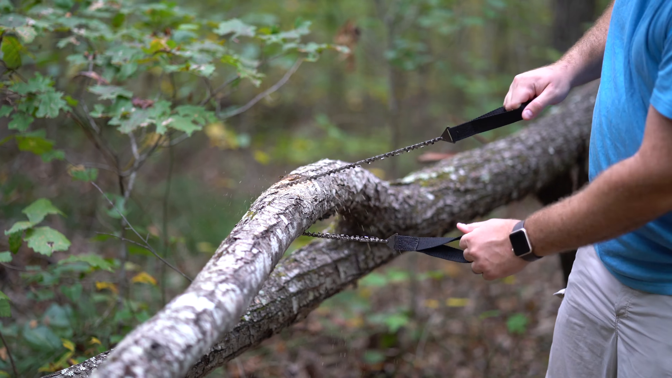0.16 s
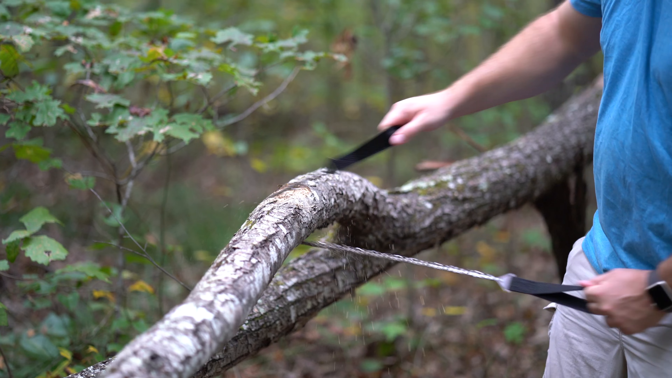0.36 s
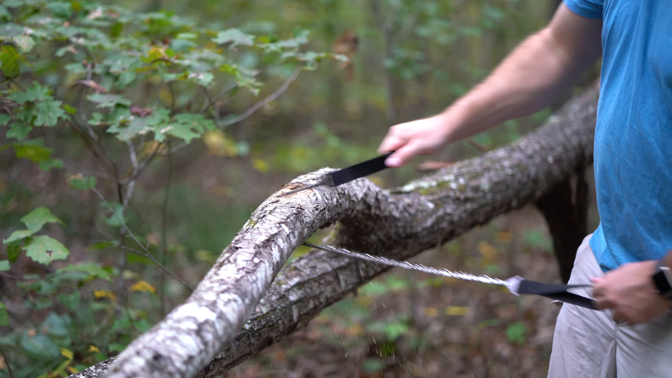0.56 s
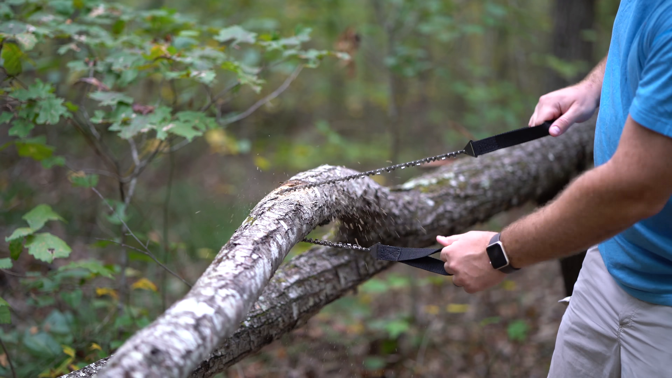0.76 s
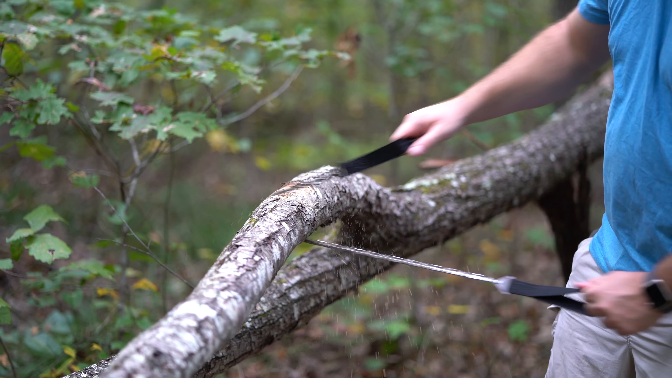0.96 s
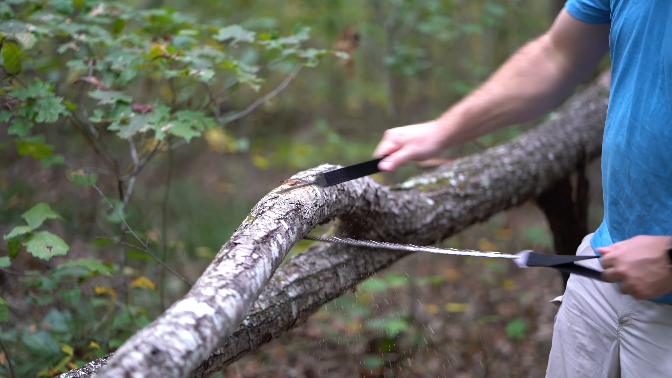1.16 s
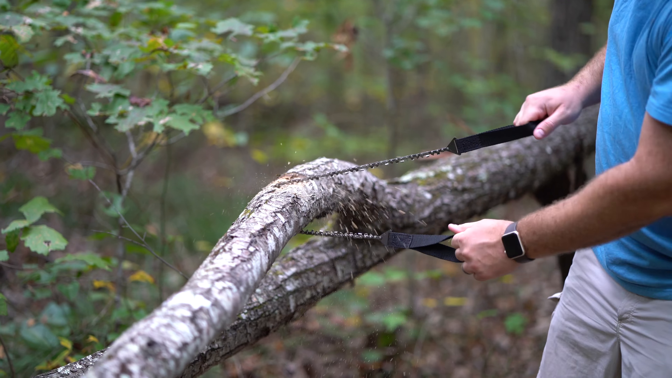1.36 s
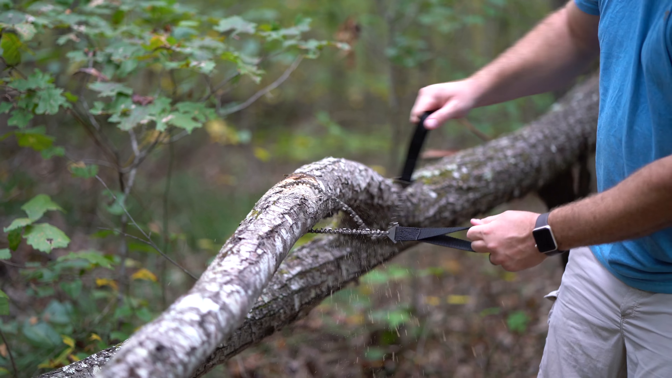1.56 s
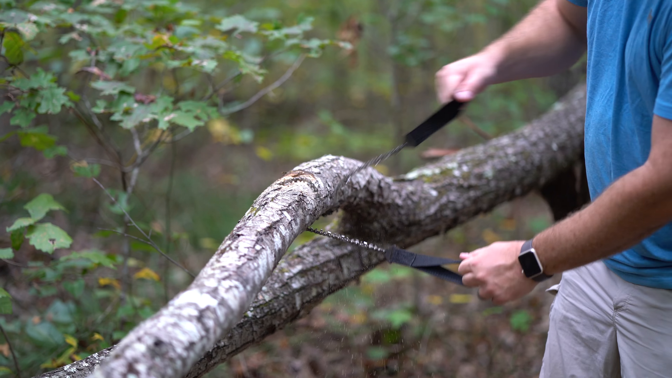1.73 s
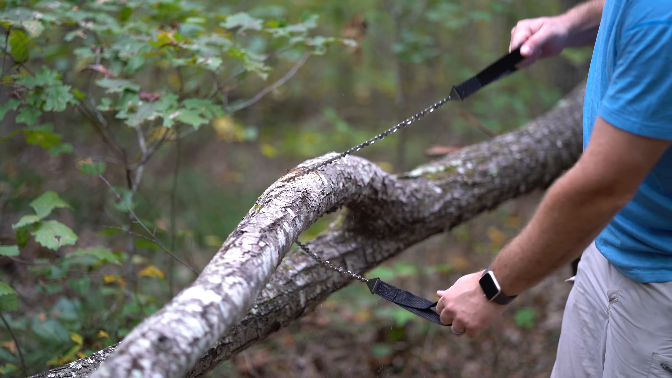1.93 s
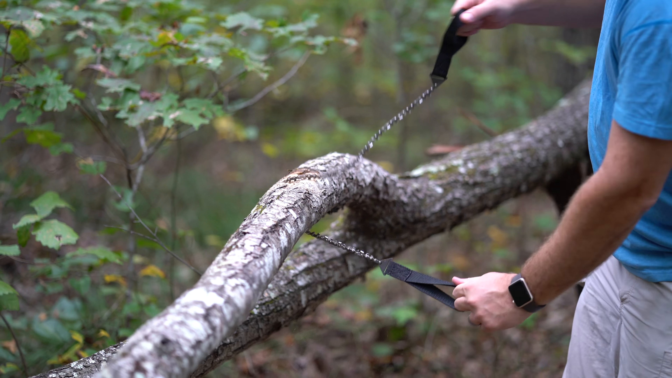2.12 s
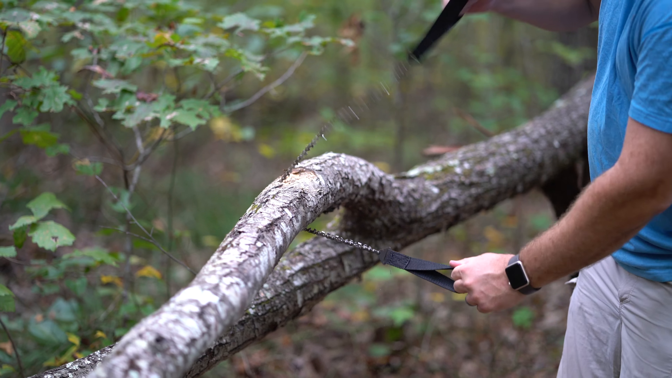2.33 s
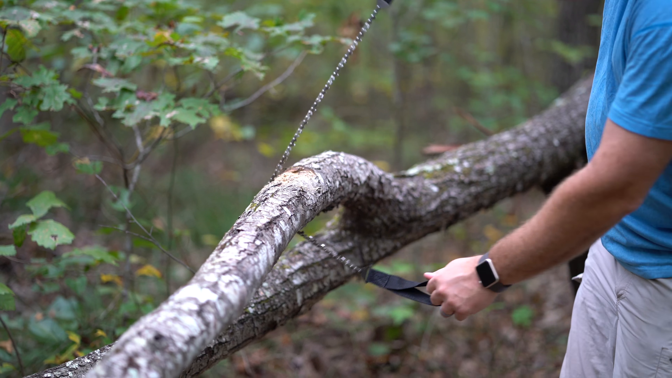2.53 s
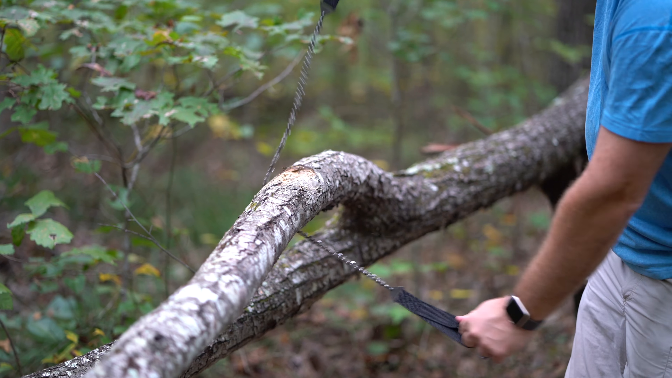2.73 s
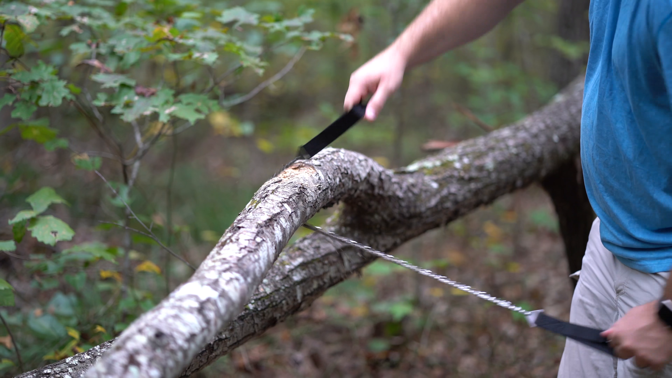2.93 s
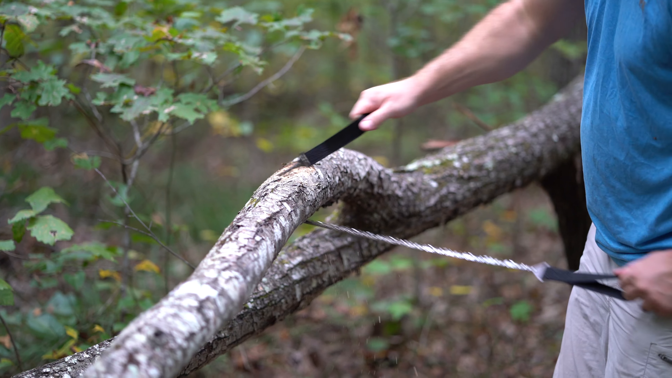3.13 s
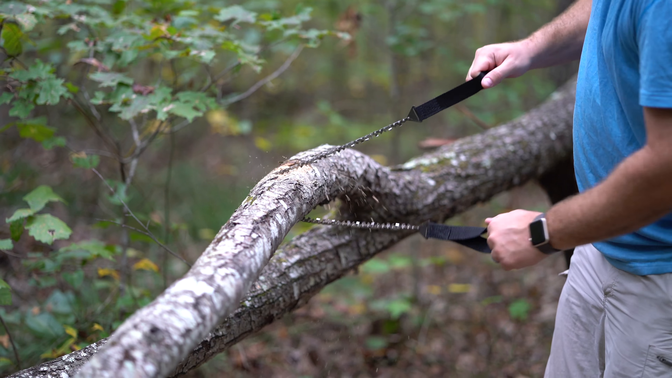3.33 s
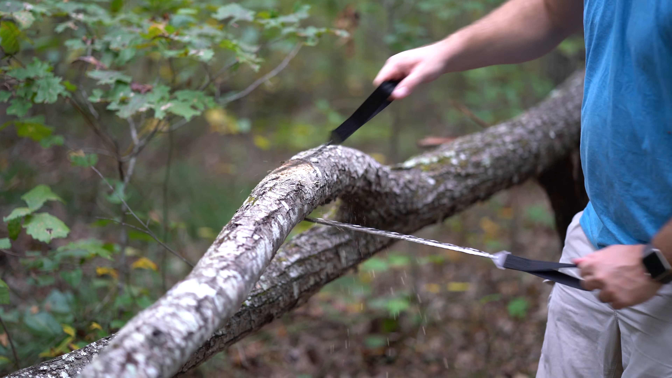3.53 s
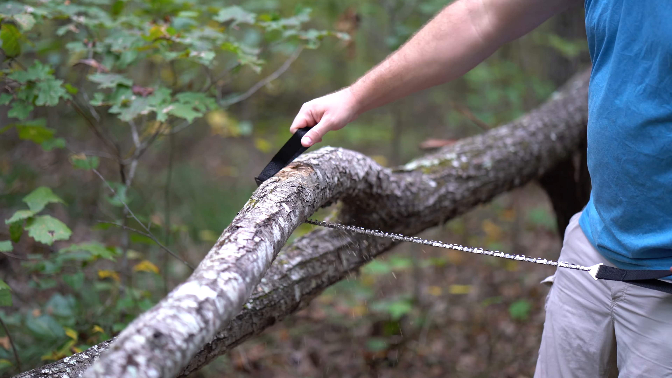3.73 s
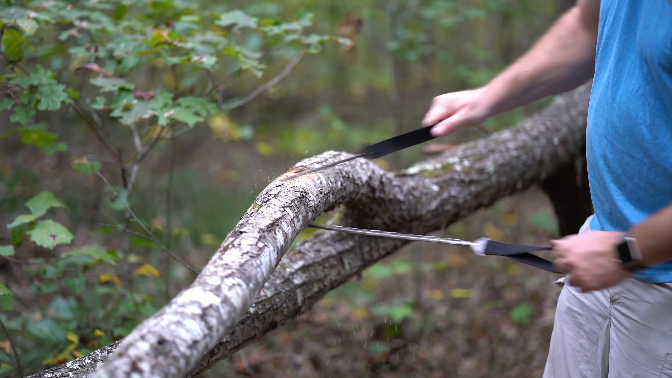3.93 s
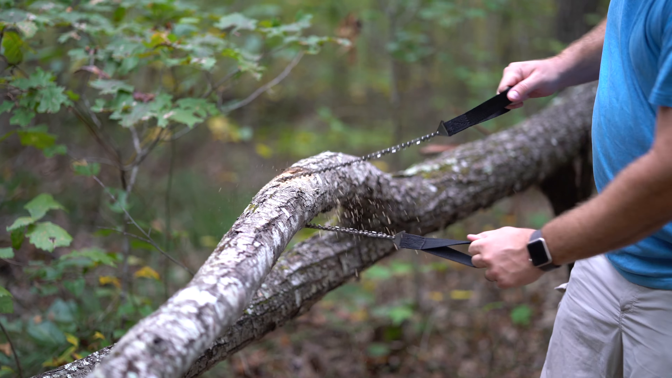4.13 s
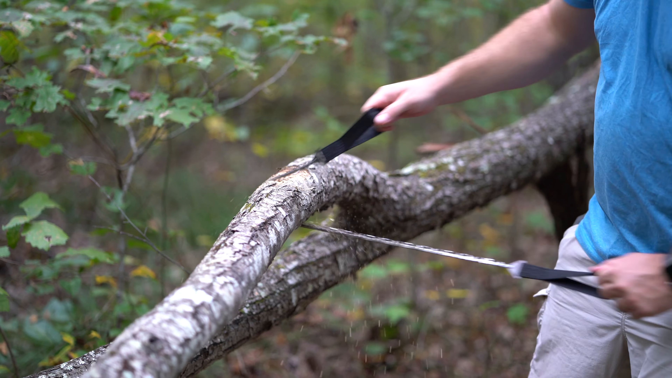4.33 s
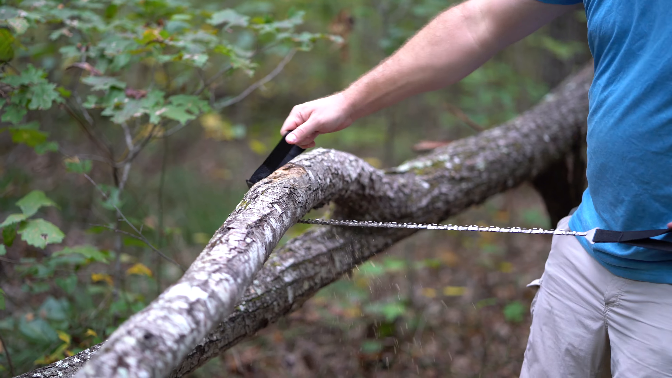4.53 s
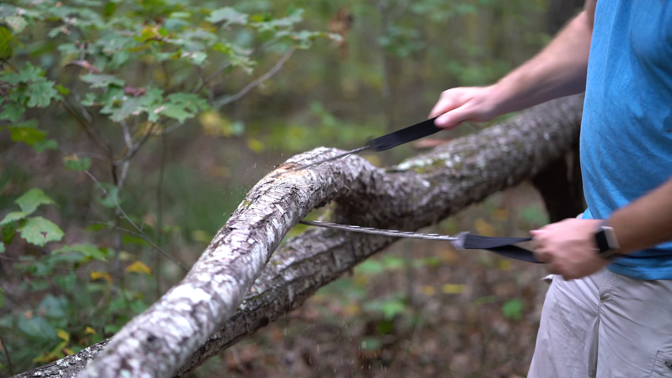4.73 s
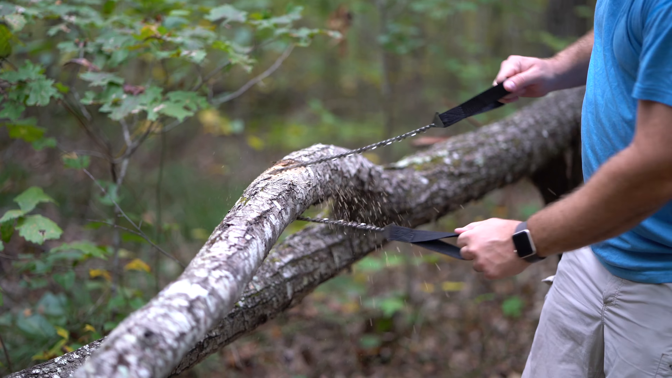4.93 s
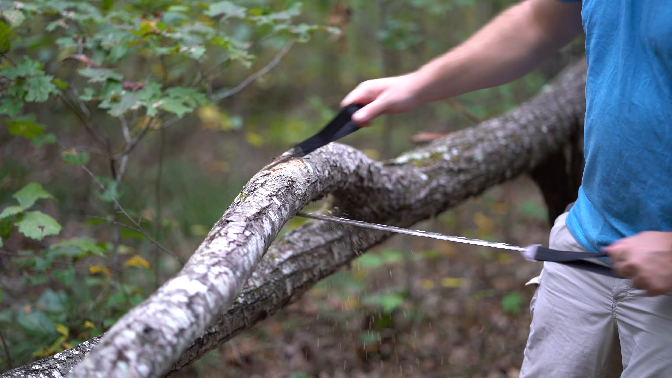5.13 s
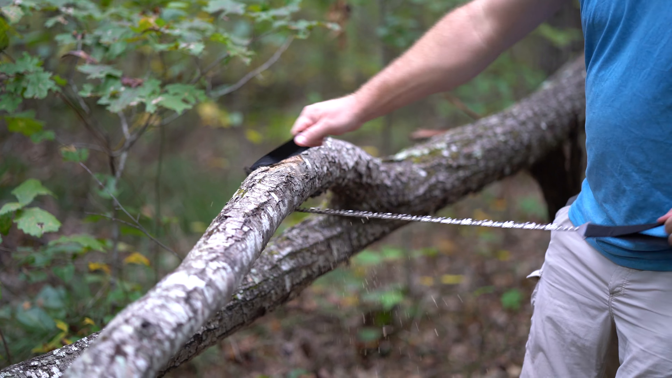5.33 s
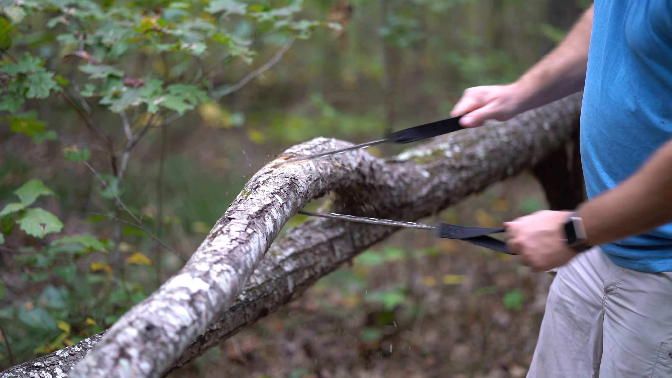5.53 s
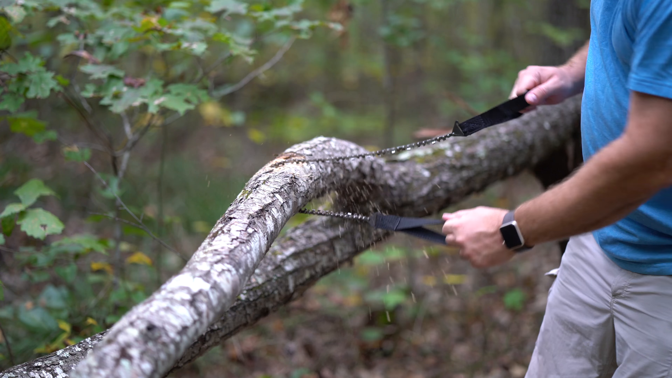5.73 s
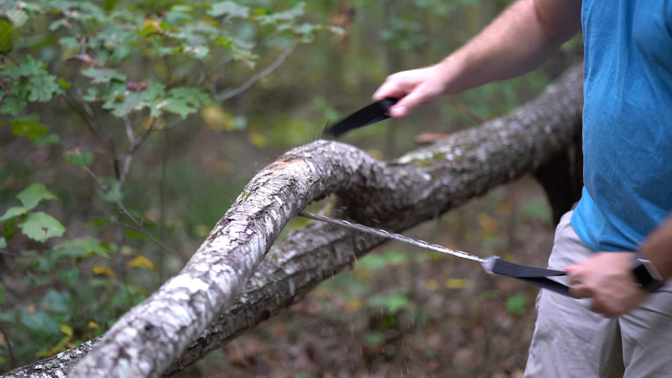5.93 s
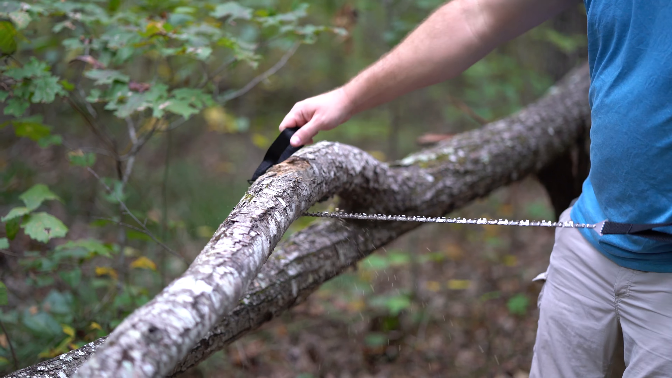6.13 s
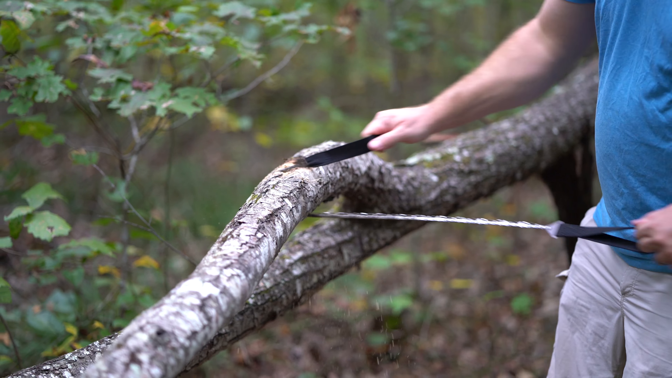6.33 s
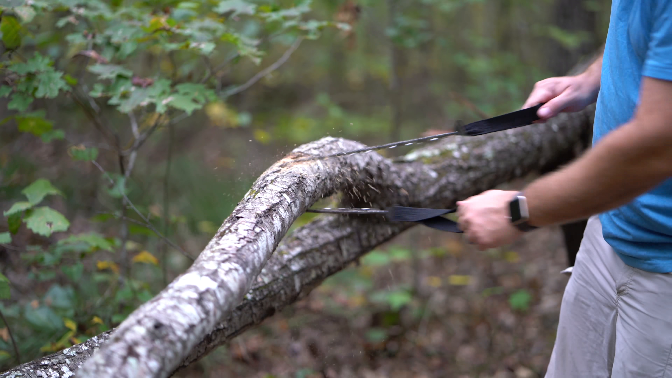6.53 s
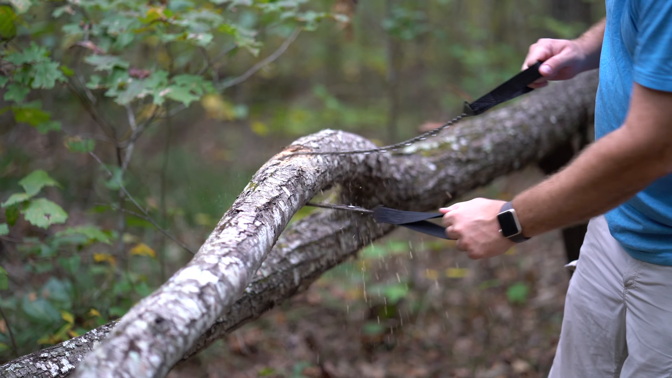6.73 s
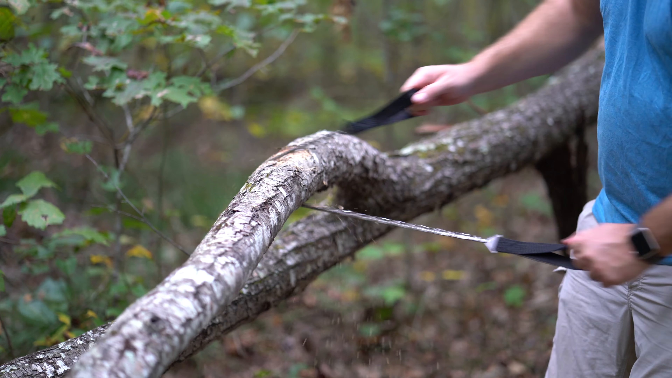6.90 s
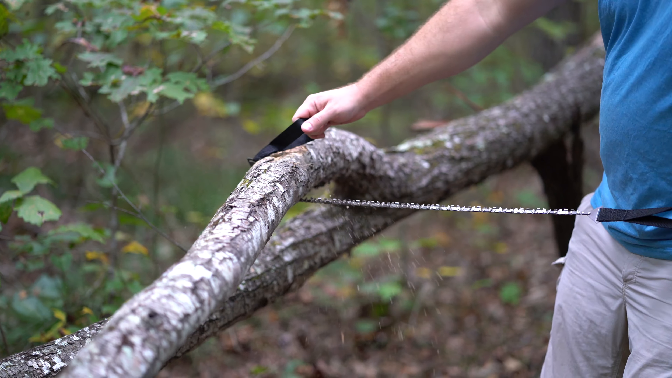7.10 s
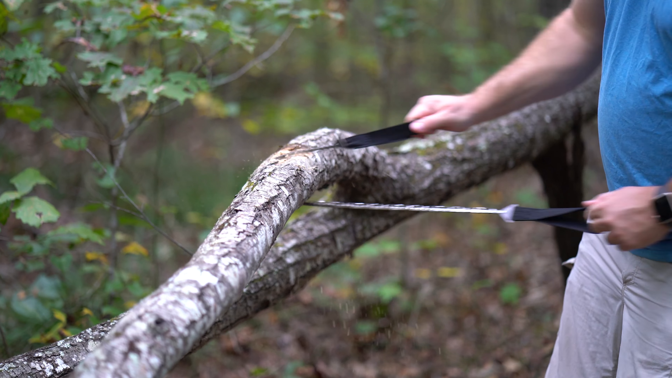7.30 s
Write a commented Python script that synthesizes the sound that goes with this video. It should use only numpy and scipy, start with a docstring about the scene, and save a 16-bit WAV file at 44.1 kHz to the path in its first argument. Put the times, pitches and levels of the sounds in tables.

```python
"""Quiet woodland: a pocket chainsaw is pulled to and fro through a dead log, close to the microphone.
Teeth bite unevenly and break fibres; these clicks ring the log, differently for each hand's pull.
After five strokes the chain goes slack, clinks and bumps the wood while it is reseated; then sawing goes on.
Tears are noise bursts through the log, steel links short ticks. Sawdust patters as random clicks
on the dry leaves below, the trees give a faint echo of noise tails, and shaped noise is the hush."""
import sys
import numpy as np
from scipy import signal
from scipy.fft import rfft, irfft
from scipy.io import wavfile
from scipy.ndimage import uniform_filter1d, minimum_filter1d

SR = 44100
rng = np.random.default_rng(int(sys.argv[2]) if len(sys.argv) > 2 else 0)


def wav_out(sig):
    """Save sig, one row per channel (or a flat mono array), as 16-bit PCM at SR to the path in sys.argv[1]."""
    wavfile.write(sys.argv[1], SR, np.round(np.clip(np.atleast_2d(sig).T, -1, 1) * 32767).astype(np.int16))


N = 324558
TIME = np.arange(N) / SR  # s

# The hands pull in turn, the upper one harder: each pull draws taut, catches, swells to a crest, slows to a stop.
# catch_s, taut_s, swell_s, slow_s (durations but for catch_s), crest_db (relative force), catch_db (re crest)
UPPER_PULLS = [(.011, 0.009, 0.12, 0.11, -16, -10), (.606, .015, 0.077, 0.16, -13, -9),
               (1.201, .012, .1, .143, -13.5, -9.5), (3.173, .014, 0.098, 0.15, -16.5, -8.5),
               (3.864, 0.0079, 0.15, 0.14, -13.5, -18.5), (4.65, 0.026, 0.15, .14, -15, -14.5),
               (5.4, .008, .158, .183, -13, -20.5), (6.347, 0.038, .16, 0.18, -13.5, -11.5),
               (7.244, 0.0085, 0.11, .17, -16.5, -13)]
LOWER_PULLS = [(.31, .01, 0.099, 0.15, -18.5, -3.5), (.91, .028, 0.12, .122, -16, -6.5),
               (2.744, 0.014, 0.19, 0.2, -24.5, -11.5), (3.517, 0.007, 0.071, 0.21, -19.5, -2.5),
               (4.246, 0.0076, 0.11, 0.22, -19, -9.5), (5.04, 0.032, .162, .132, -17, -10),
               (5.907, .007, .07, 0.17, -17.5, -4.5), (6.102, 0.021, 0.028, .095, -21.5, -4.5),
               (6.818, .024, 0.17, 0.17, -17.5, -7.5)]
# Broad colour of the log under each hand's pull: frequency_hz, level_db (relative, per Hz)
UPPER_RASP = [(47, -82), (80, -52), (166, -27.5), (202, -35), (320, -12.5), (374, -12), (519, -4),
              (641, -1.5), (734, -2.5), (942, 1), (1230, -3.5), (1360, -2.5), (1620, -11.5), (1810, -9.5),
              (8000, -39.5), (10400, -50), (17600, -120)]
LOWER_RASP = [(47, -93), (80, -47), (214, -15.5), (353, -14.5), (404, 0), (480, -9), (539, 1.5),
              (582, -9.5), (666, 0.5), (1210, -5.5), (1330, -2.5), (1650, -10), (2620, -13.5),
              (3050, -20.5), (8000, -39.5), (10400, -89), (17600, -120)]
# Colour of the steel links: frequency_hz, level_db (relative, per Hz)
STEEL = [(1000, -32), (2800, 6), (4000, 9), (5500, 8), (7200, 6.5), (9000, -7), (12000, -8), (15500, -30)]


def gain_of(db):
    """Decibels to amplitude."""
    return 10 ** (np.asarray(db) / 20)


def evened(x):
    """Scales to rms 1."""
    return x / np.sqrt(np.mean(x ** 2) + 1e-20)


def steadied(x, span):
    """Holds the rms near 1 over spans of this many seconds, and keeps the faster grain."""
    window = np.hanning(int(span * SR))
    power = abs(signal.fftconvolve(x ** 2, window / window.sum(), "same"))
    return x / np.sqrt(power + 1e-12)


def read(points, hz):
    """Reads a curve, joined by straight lines on a log-frequency axis."""
    f, value = np.transpose(points)
    return np.interp(np.log(hz + 1), np.log(f + 1), value)


def add(mix, s, sound):
    """Mixes a sound in at a time in seconds."""
    part = mix[max(round(s * SR), 0):][:len(sound)]
    part += sound[:len(part)]


def ring(colour, modes=(), tilt_db=0, size=8192):
    """Causal (minimum-phase) impulse response of a body with a broad colour and resonances; energy 1."""
    hz = np.fft.rfftfreq(size, 1 / SR)
    # the tilt, in dB an octave, pivots at 1 kHz and levels off outside 300 to 2500 Hz
    db = read(colour, hz) + tilt_db * np.log2(np.clip(hz, 300, 2500) / 1000)
    for centre, width, lift_db in modes:
        db = db + lift_db / (1 + (2 * (hz - centre) / width) ** 2)
    both_sides_db = np.maximum(np.r_[db, db[-2:0:-1]], -100)
    log_gain = both_sides_db * np.log(10) / 20
    response = np.fft.ifft(np.exp(np.conj(signal.hilbert(log_gain)))).real[:size // 2]
    return response / np.linalg.norm(response)


def fractures(per_s, spread_db):
    """Clicks of breaking fibres or small impacts, of random time, size and sign."""
    size = gain_of(spread_db * np.clip(rng.standard_normal(N), -2, 2))
    sign = rng.choice([-1, 1], N)
    return size * sign * (rng.random(N) < per_s / SR)


def ticks(events, colour, level_db, fade_s, rattle, rattle_s, size=1500):
    """Sharp impacts: a noise burst with a short, weaker rattle after it excites a small body."""
    out, t, body = np.zeros(N), TIME[:size], ring(colour)
    fade = np.exp(-t / fade_s) + rattle * np.exp(-t / rattle_s)
    for (s, db), chatter in zip(events, rng.standard_normal((len(events), size))):
        tick = signal.fftconvolve(chatter * fade, body)
        add(out, s, gain_of(db + level_db) * tick / abs(tick).max())
    return out


def hush(level_db):
    """Still woodland air: steady noise, much alike in both ears up to 6 kHz, then spreading wide."""
    # Colour of the air: frequency_hz, level_db (relative, per Hz)
    hush_colour = [(12, -18), (20, -2), (80, 2.5), (126, 0), (324, 4), (404, 0.5), (1100, 2), (1820, -7),
                   (2400, -2), (5690, -4), (6360, -6), (6910, -7), (15500, -16)]
    # Left-right correlation: frequency_hz, likeness (0 to 1)
    likeness = [(30, 0.79), (150, 0.77), (1000, 0.88), (3000, 0.79), (6000, 1), (15000, 0)]
    hz = np.fft.rfftfreq(N, 1 / SR)
    centre, wide = rfft(rng.standard_normal((2, N))) * gain_of(read(hush_colour, hz))
    same = np.clip(read(likeness, hz), 0, 1)
    wide = wide * np.sqrt((1 - same) / (1 + same))
    ears = irfft(np.array([centre + wide, centre - wide]), N)
    return gain_of(level_db) * ears / np.std(irfft(centre, N))


def echo(sound, level_db, t60, width):
    """The trunks return a faint noise tail, strongest around 2 to 5 kHz, a little different in each ear."""
    # Colour of the trees' echo: frequency_hz, level_db (relative, per Hz)
    trees = [(150, -15), (500, -14.5), (1100, -7.5), (2000, 0.5), (5000, -2.5), (15000, -32)]
    t = TIME[:SR]  # the tail is cut at 1 s
    fade = (1 - np.exp(-t / 0.09)) * gain_of(-60 * t / t60)
    noise = rng.standard_normal((2, SR)) * fade
    centre, wide = signal.oaconvolve(noise, ring(trees)[None], axes=1)
    tails = np.array([centre + width * wide, centre - width * wide])
    tails = tails / np.linalg.norm(tails[0])
    return gain_of(level_db) * signal.oaconvolve(sound[None], tails, axes=1)[:, :N]


def sawdust(level_db):
    """Countless crumbs and a few chips strike the leaf litter: random clicks and ticks in the leaves' colour."""
    # Patter on the ground, a little after the cutting: time_s, level_db (before the trim level_db)
    dust_level = [(0, -78), (1.4, -56), (1.9, -50.5), (2.4, -60.5), (3.6, -73.5), (4.9, -53), (7.36, -55)]
    # Colour of the dry leaves: frequency_hz, level_db (relative, per Hz)
    leaves = [(1200, -14), (3000, -17), (5000, 0.5), (7000, 4.5), (10000, 1.5), (15500, -7.5)]
    # Larger chips landing: start_s, peak_db (before the trim in ticks)
    chip_falls = [(2.217, -26.5), (5.888, -24), (7.030, -18)]
    patter = evened(signal.oaconvolve(fractures(per_s=2200, spread_db=6.5), ring(leaves))[:N])
    chips = ticks(chip_falls, leaves, level_db=-5, fade_s=0.00074, rattle=0.11, rattle_s=.004)
    return gain_of(np.interp(TIME, *np.transpose(dust_level)) + level_db) * patter + chips


def jingle(per_s, taut_db, slack_db):
    """Links tick faintly at random as the chain flexes, a little louder just after the chain goes slack."""
    just_slack = (TIME > 1.45) & (TIME < 1.9)
    links = evened(signal.oaconvolve(fractures(per_s, spread_db=6), ring(STEEL))[:N])
    return gain_of(np.where(just_slack, slack_db, taut_db)) * links


def bumps(modes, level_db, clatter, clatter_s, size=1200):
    """The slack chain bumps the log: a blunt blow, with the next links clattering down after it."""
    # Blows on the wood: start_s, peak_db (before the trim level_db), brightness_db (per octave)
    blows = [(1.495, -31, -6.5), (1.69, -31.5, 5.5), (1.843, -38, 0), (1.979, -29, -4), (2.093, -25.5, 1),
             (2.116, -35, 13), (2.205, -34.5, 6), (2.426, -28, -7), (2.532, -36.5, -10), (2.604, -39.5, -4)]
    out = np.zeros(N)
    fade = np.exp(-TIME[:size] / clatter_s)
    for (s, db, bright_db), links in zip(blows, rng.standard_normal((len(blows), size))):
        blow = signal.unit_impulse(size) + clatter * links * fade
        knock = signal.fftconvolve(blow, ring(LOWER_RASP, modes, bright_db))
        add(out, s, gain_of(db + level_db) * knock / abs(knock).max())
    return out


def jerks(modes, level_db, judder, judder_s, size=3000):
    """Low booms in the log: the lower hand's pulls jerk to a stop, and once the slack chain bumps it."""
    # Tugs, and the one bump, on the log: start_s, peak_db (before the trim level_db)
    tugs = [(.526, -26), (1.122, -19), (2.432, -34.5), (3.713, -27), (5.24, -12), (6.136, -27),
            (7.074, -20)]
    # So soft a blow rings mainly the low modes: frequency_hz, level_db (relative, per Hz)
    boom_colour = [(150, -39), (300, -18), (410, 6), (520, 1), (900, -46)]
    out, boom = np.zeros(N), ring(boom_colour, modes)
    fade = np.exp(-TIME[:size] / judder_s)
    for (s, db), slips in zip(tugs, rng.standard_normal((len(tugs), size))):
        tug = signal.fftconvolve(signal.unit_impulse(size) + judder * slips * fade, boom)
        add(out, s, gain_of(db + level_db) * tug / abs(tug).max())
    return out


def snags(modes, level_db, size=1200):
    """Fibre bundles tear within milliseconds, as pulls catch and during them; dry, thin ones crack brighter."""
    # Hard catches in mid-pull: start_s, level_db (before the trim), brightness_db (per octave), fade_s
    tears = [(.116, -24, -11, 0.0023), (.367, -18.5, 10, 0.0046), (.666, -17, 3.5, 0.007),
             (.973, -17, 7, 0.0036), (1.011, -3, 0.5, 0.0016), (1.07, -18, 11, 0.0037),
             (1.227, -12.5, -1, 0.0063), (1.279, -12.5, 2.5, 0.0057), (2.748, -29, 17, 0.0036),
             (2.824, -21.5, 9.5, 0.0082), (2.909, -23, 5, 0.0014), (3.095, -34, 4, .003),
             (3.206, -15, -5, 0.014), (3.291, -23, -1, 0.0029), (3.649, -35, -1, .002),
             (3.721, -22.5, 1, 0.0036), (3.931, -17, -4, .004), (3.973, -14.5, -3, .0024),
             (3.999, -11, -1, .006), (4.293, -16.5, 0, .003), (4.424, -16.5, 0.5, .005),
             (4.485, -20, 3.5, 0.0037), (4.713, -16.5, -2, .003), (4.769, -15.5, 4, .003),
             (4.829, -13.5, -0.5, 0.0037), (5.157, -22, 17, .004), (5.196, -11.5, 0.5, .007),
             (5.252, -16.5, 0.5, 0.0044), (5.464, -19.5, 5, .003), (5.553, -9, -0.5, 0.0024),
             (5.971, -12.5, 5, 0.0061), (6.007, -17, 8, 0.0082), (6.421, -10, -3.5, .004),
             (6.475, -11.5, -1, 0.005), (6.533, -12.5, 4, 0.0031), (7.01, -18.5, 4, 0.0051)]
    first_above_catch_db, first_bright_db, first_fade_s = 0.68, 0, 0.0027  # the snag that opens each pull
    rise_s = 0.0011  # a tear takes a moment to spread
    out, t = np.zeros(N), TIME[:size]
    events = [(s, crest_db + catch_db + first_above_catch_db, first_bright_db, first_fade_s)
              for s, *_, crest_db, catch_db in [*UPPER_PULLS, *LOWER_PULLS]]
    events = [*events, *tears]
    spread = 1 - np.exp(-(t / rise_s) ** 2)
    for (s, db, bright_db, fade_s), tear in zip(events, rng.standard_normal((len(events), size))):
        wood = ring(UPPER_RASP, modes, bright_db, size=4096)
        crack = signal.fftconvolve(tear * spread * np.exp(-t / fade_s), wood)
        loudest = np.sqrt(uniform_filter1d(crack ** 2, size=220).max())  # rms over 5 ms
        add(out, s, gain_of(db + level_db) * crack / loudest)
    return out


def effort(catch_s, taut_s, swell_s, slow_s, catch_db):
    """Force of one pull over time, in dB re its crest: tighten, catch, swell, slow down."""
    tighten_db, catch_step_db = 11, 2.5  # rise while drawing taut, then the jump as the teeth catch
    swell_curve = 1.7  # quick at first, levelling off at the crest
    stop_db, stop_curve = 30.5, 2.5  # fall over slow_s, gentle at first
    t = TIME - catch_s
    tighten = np.where(t < 0, -catch_step_db + tighten_db * t / taut_s, 0)
    swell = catch_db * np.clip(1 - t / swell_s, 0, 1) ** swell_curve
    slow = -stop_db * np.clip((t - swell_s) / slow_s, 0, 2) ** stop_curve
    return np.maximum(tighten + swell + slow, -120)


def bites(per_s, jitter, spread_db, fade_s, drag):
    """Teeth meet the wood at uneven intervals; each bite starts at once and fades into plain drag."""
    pace = per_s * np.exp(jitter * evened(uniform_filter1d(rng.standard_normal(N), size=200)))
    meets = np.diff(np.floor(np.cumsum(pace) / SR), prepend=0)  # 1 where a tooth arrives
    depth = gain_of(spread_db * np.clip(rng.standard_normal(N), -2, 2))
    return drag + signal.lfilter([1], [1, -np.exp(-1 / (fade_s * SR))], meets * depth)


def sawing(strokes, wood, teeth_per_s, rasp_db, fizz_db, dull_hz, deepen_db, deep_hz):
    """Teeth break fibres in bunches: coarse ones ring the log, fine ones fizz."""
    # Colour of the fine splinters: frequency_hz, level_db (relative, per Hz)
    fizz_colour = [(1500, -29), (3000, -0.5), (4500, 0), (7000, -1.5), (10000, -8), (15500, -20)]
    fizz_follows = 0.68  # dB of fizz for each dB of force within a pull
    kerf_db_per_s = 0.36  # the low notes grow as the chain sinks into the log
    force, splinters, travel = np.zeros((3, N))
    for catch_s, taut_s, swell_s, slow_s, crest_db, catch_db in strokes:
        db = effort(catch_s, taut_s, swell_s, slow_s, catch_db)
        pull = gain_of(crest_db + db)
        travel = np.where(pull > force, np.cumsum(pull) / pull.sum(), travel)  # 0 to 1 along each stroke
        force = np.maximum(force, pull)
        splinters = np.maximum(splinters, gain_of(crest_db + fizz_follows * db))
    speed = .4 + .6 * np.sqrt(force / force.max())  # a harder pull runs faster
    bite = bites(teeth_per_s * speed, jitter=.4, spread_db=2.5, fade_s=0.009, drag=0.36)
    coarse = force * steadied(bite * fractures(per_s=5000, spread_db=1.5), span=0.095)
    fine = splinters * steadied(bite * fractures(per_s=9000, spread_db=0), span=0.21)
    # the drawn-out length of chain grows through the stroke and changes the low notes by deepen_db
    low = signal.sosfiltfilt(signal.butter(2, deep_hz, fs=SR, output="sos"), coarse)
    low_db = deepen_db * (travel - .5) + kerf_db_per_s * (TIME - TIME.mean())
    coarse = coarse + low * (gain_of(low_db) - 1)
    dull = signal.butter(2, dull_hz, fs=SR)
    rasp = signal.lfilter(*dull, signal.oaconvolve(coarse, wood)[:N])
    fizz = signal.oaconvolve(fine, ring(fizz_colour))[:N]
    return gain_of(rasp_db) * rasp + gain_of(fizz_db) * fizz


def scene():
    """The saw straight ahead; its echo, falling dust and the woodland's hush all around."""
    # Resonances of the log with the taut chain: centre_hz, width_hz, upper_lift_db, lower_lift_db
    modes = np.array([(179.3, 8.5, 14, -1.5), (221.2, 19, 7.5, 5), (325.4, 11.6, -3, 7), (395, 21, 3, 5.5),
                      (438, 40, 6, 5.5), (500, 68, -4, -1.5), (645, 19, 7, -1), (912, 33, 1.5, 0),
                      (1095, 35, 2.5, 3), (1256, 43, -9.5, -4.5), (1296, 102, 1.5, 4), (1357, 78, 4, 3),
                      (1768, 30, 2, 4), (2475, 100, 2.5, -1), (3302, 140, 3, 6.5), (3820, 21, 8, 14.5),
                      (4310, 31, 7.5, -1), (4810, 83, 9, 10.5)])
    # The slack chain slides over the bark, briefly and lightly: columns as for the pulls
    slides = [(1.49, .004, .01, 0.036, -41.5, -2), (1.845, .004, .01, 0.12, -48, -1),
              (1.975, .004, .014, 0.033, -36.5, -6.5), (2.392, 0.0044, .013, .016, -47, -5.5),
              (2.53, 0.0035, .018, 0.072, -46, -11), (2.585, 0.0038, .022, 0.016, -44, -8)]
    # Steel links click together: start_s, peak_db (before the trim in ticks)
    clinks = [(0.9702, -29), (1.5389, -40), (1.5646, -30.5), (1.5867, -38), (1.6706, -35), (1.6916, -36),
              (1.933, -33.5), (3.022, -26), (3.5395, -33), (4.2413, -40), (4.9876, -38), (5.256, -19.5),
              (5.8373, -37), (5.9364, -19.5), (5.9469, -11.5), (6.0197, -15), (6.27, -36), (6.552, -17.5),
              (6.6724, -29), (6.7675, -36)]
    upper_modes, lower_modes = modes[:, [0, 1, 2]], modes[:, [0, 1, 3]]
    upper, lower = ring(UPPER_RASP, upper_modes), ring(LOWER_RASP, lower_modes)

    saw = jingle(per_s=45, taut_db=-65, slack_db=-61.5)
    saw += ticks(clinks, STEEL, level_db=2, fade_s=0.0009, rattle=0.15, rattle_s=0.007)
    saw += bumps(lower_modes, level_db=-3.5, clatter=0.15, clatter_s=0.008)
    saw += jerks(lower_modes, level_db=-4, judder=0.24, judder_s=0.011)
    saw += snags(upper_modes, level_db=-.5)
    saw += sawing(slides, upper, teeth_per_s=90, rasp_db=-3, fizz_db=-21,
                  dull_hz=5000, deepen_db=-5, deep_hz=330)
    saw += sawing(LOWER_PULLS, lower, teeth_per_s=150, rasp_db=0.08, fizz_db=-21.5,
                  dull_hz=4520, deepen_db=3, deep_hz=375)
    saw += sawing(UPPER_PULLS, upper, teeth_per_s=200, rasp_db=0.0, fizz_db=-25.5,
                  dull_hz=4170, deepen_db=13.0, deep_hz=310)

    dust = np.array([sawdust(level_db=-2.0) for ear in "LR"])  # each ear hears other leaves
    return hush(level_db=-55.5) + dust + echo(saw, level_db=-35, t60=2.45, width=0.1) + saw


def record(dry):
    """A fast limiter eases both channels down around the highest peaks; then a low-pass limits the band."""
    ceiling, edge_hz = .84, 15700
    room = ceiling / np.maximum(abs(dry).max(axis=0), ceiling)
    limited = dry * uniform_filter1d(minimum_filter1d(room, size=401), size=401)  # 401 samples: 9 ms
    low_pass = signal.firwin(511, edge_hz, window=("kaiser", 9), fs=SR)
    return signal.oaconvolve(limited, low_pass[None], "same")


dry = scene()
out = record(dry)
wav_out(out)
```